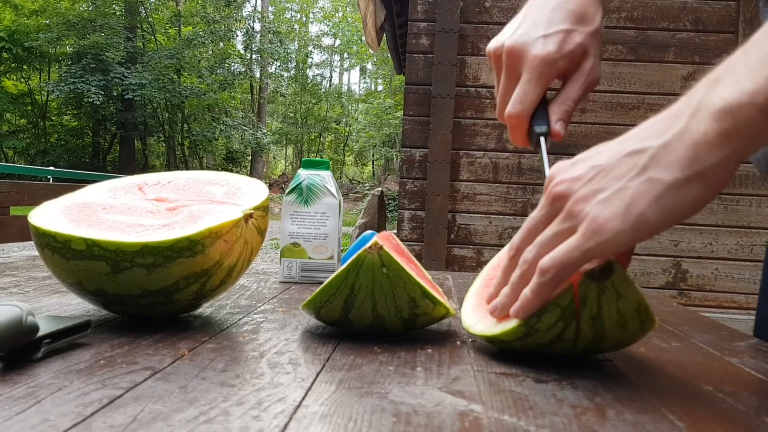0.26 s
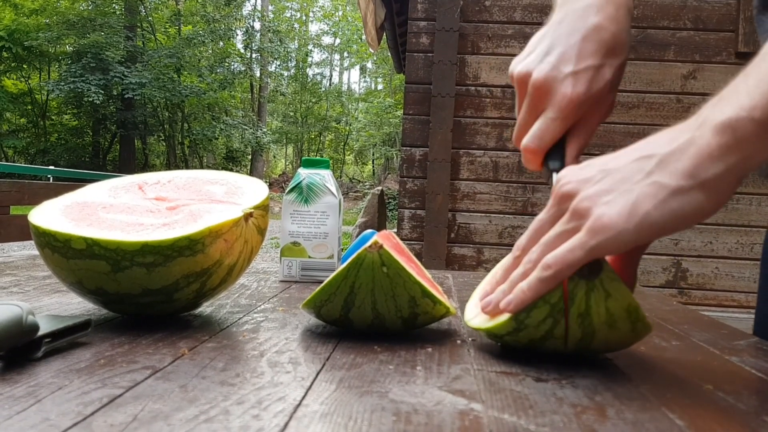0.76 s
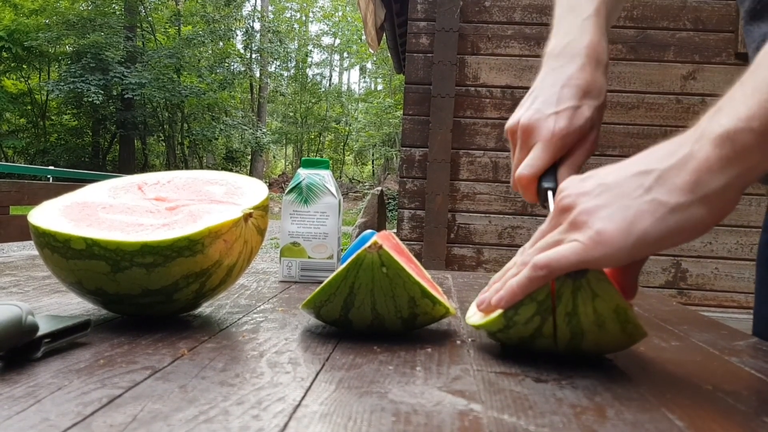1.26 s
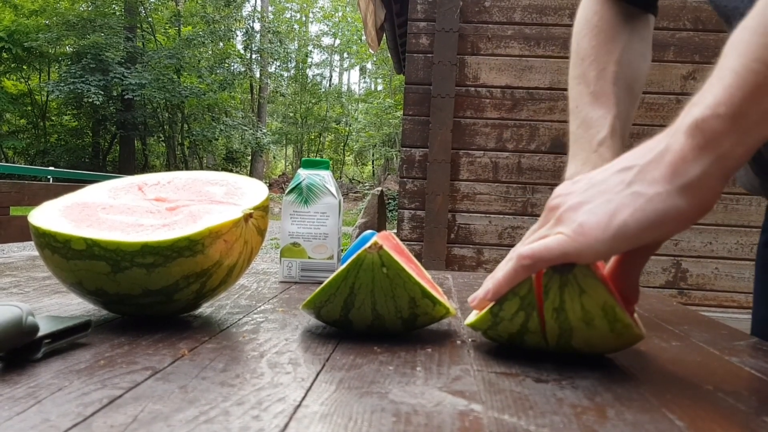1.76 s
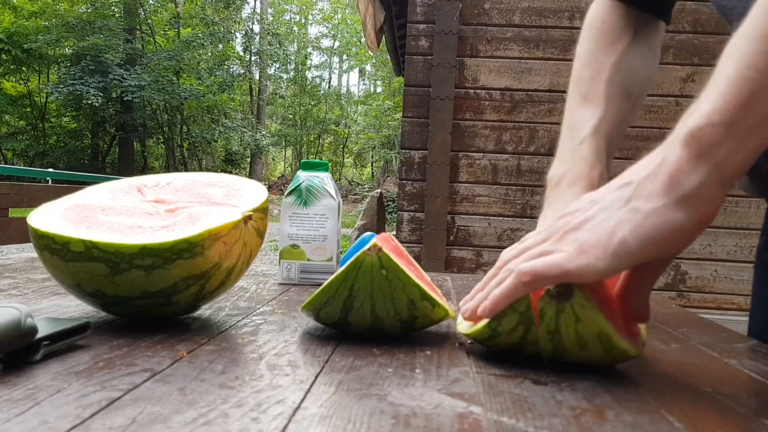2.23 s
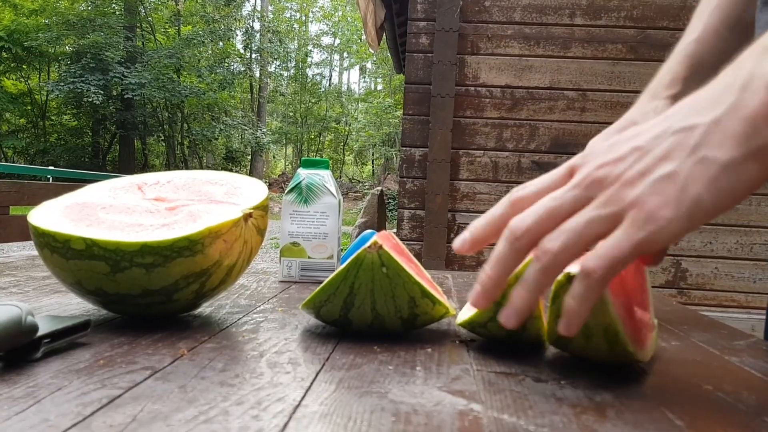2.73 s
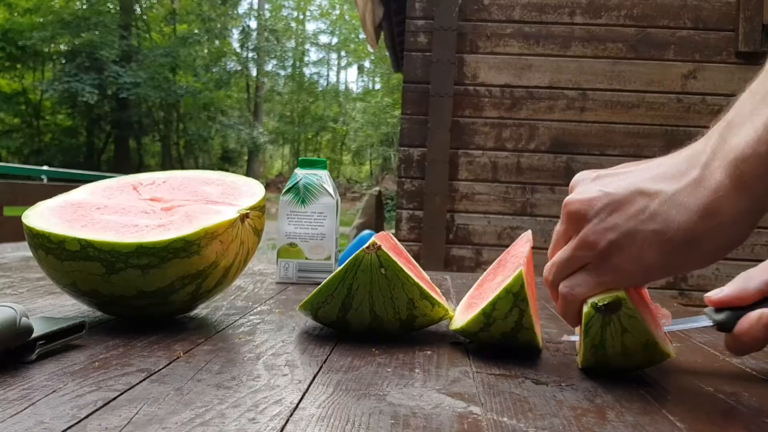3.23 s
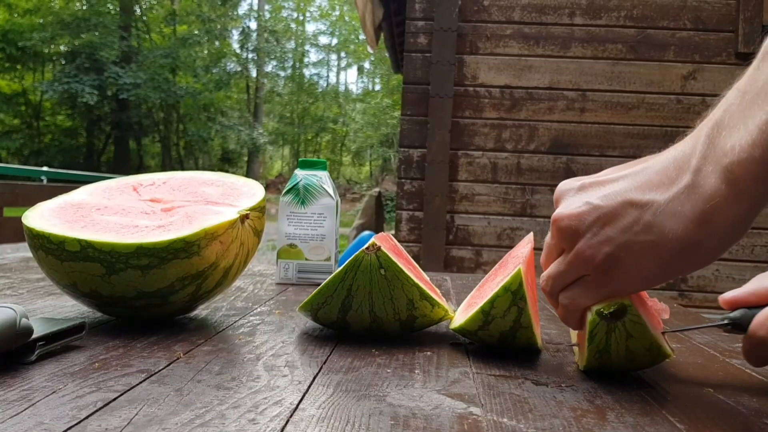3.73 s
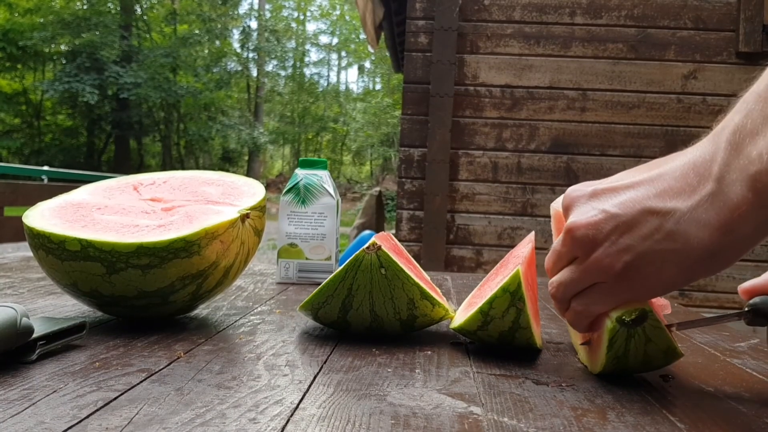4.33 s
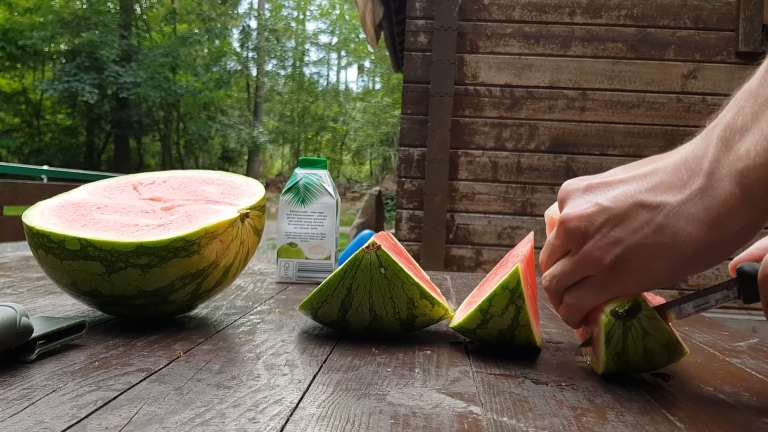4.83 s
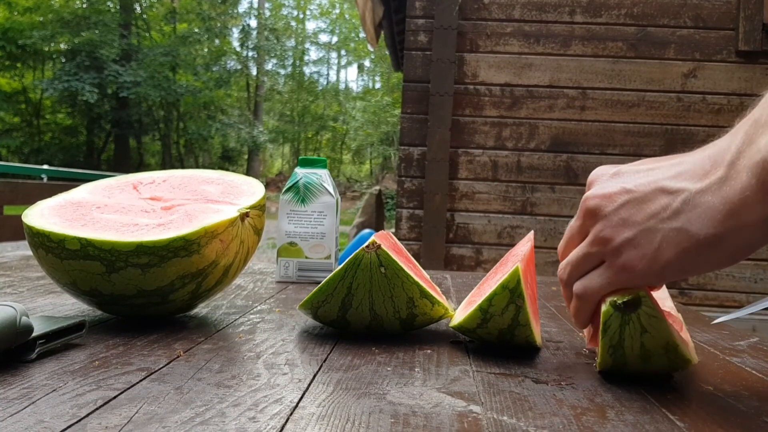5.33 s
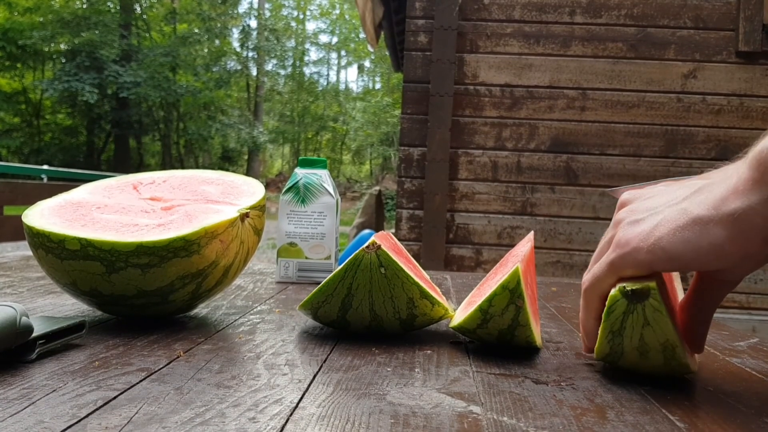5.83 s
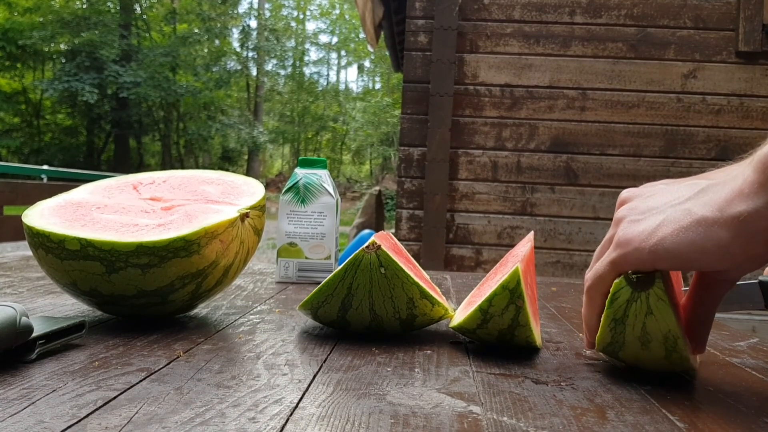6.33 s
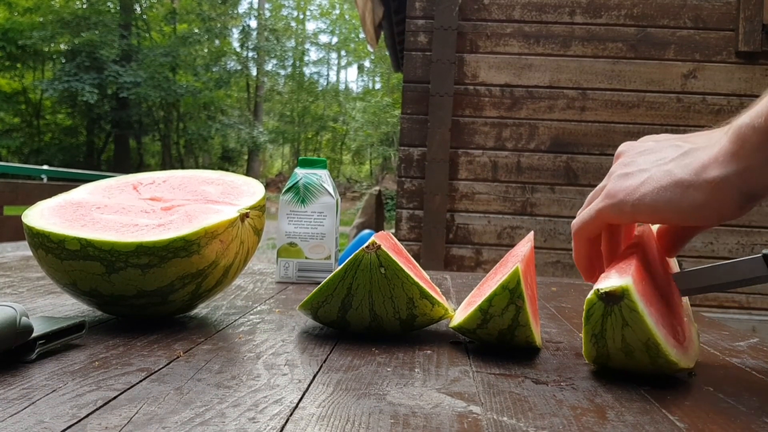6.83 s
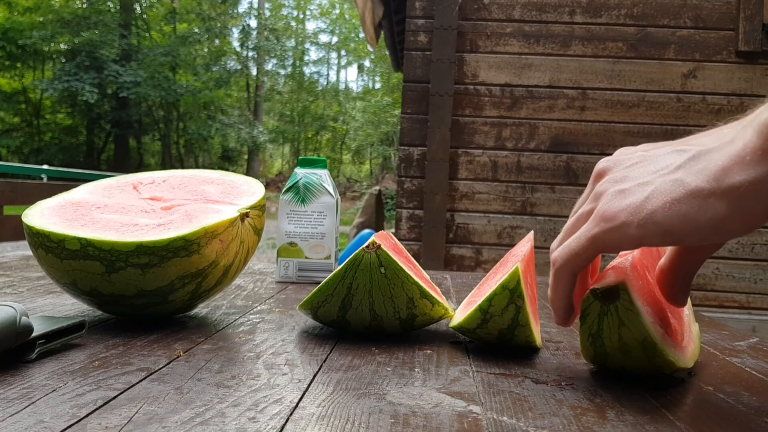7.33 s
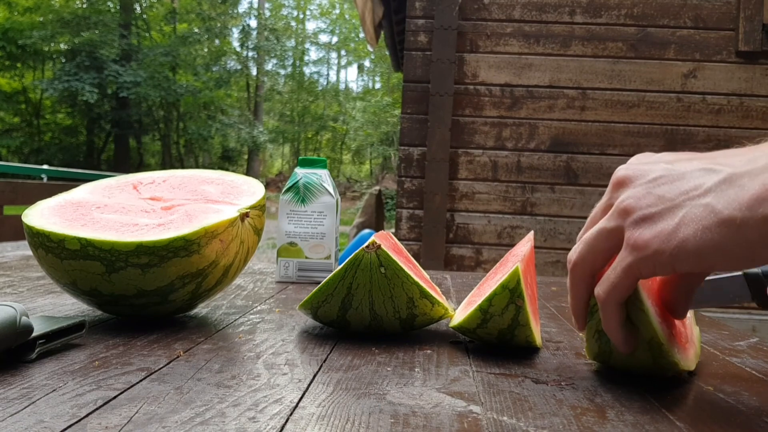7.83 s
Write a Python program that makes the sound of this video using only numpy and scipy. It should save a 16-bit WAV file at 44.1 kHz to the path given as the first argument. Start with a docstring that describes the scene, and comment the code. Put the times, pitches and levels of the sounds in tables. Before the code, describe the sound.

Outdoor birdsong over soft air and low drone; crisp wet melon cutting, one loud woody knock at two seconds, more crackly sawing, faint squeak.

```python
"""Birdsong with long echoes opens the scene, over forest air, a faint far drone and a hum.
A knife then cuts a wedge of watermelon on a wooden table, a little to the right: the rind splits, the blade
breaks through and knocks on the table, then saws through wet flesh and squeaks once.
Birds, hum and squeak are gliding sines; air and drone are shaped noise; cutting is coloured random
clicks and bursts; knocks ring decaying modes of the table and the fruit."""
import sys
import numpy as np
from scipy import signal
from scipy.fft import rfft, irfft
from scipy.io import wavfile
from scipy.ndimage import uniform_filter1d

SR = 44100
rng = np.random.default_rng(int(sys.argv[2]) if len(sys.argv) > 2 else 0)


def output_pcm(signal):
    """Save a mono or channel-first signal as 16-bit PCM at the path in sys.argv[1].

    Samples are clipped to [-1, 1] before scaling.
    """
    pcm = np.clip(np.atleast_2d(signal).T, -1, 1) * 32767
    wavfile.write(sys.argv[1], SR, np.round(pcm).astype(np.int16))


N = 355887
TIME = np.arange(N) / SR  # s
HZ = np.fft.rfftfreq(N, 1 / SR)

# Forest air and microphone hiss. Each row: frequency in Hz, relative density in dB per Hz.
AIR_SPECTRUM = [(24, -31), (40, -2.5), (65, 1), (95, -7), (120, -7), (155, -8), (280, -16), (500, -19),
                (1000, -23), (1500, -29.5), (5000, -40), (7000, -37.5), (8500, -49), (10500, -39),
                (13000, -34.5), (16000, -40.5)]
# Slow level of the background: it swells near 2 s and drops soon after. Each row: time in seconds, level in dB.
AIR_LEVEL = [(0, -55), (2.0, -52.5), (2.4, -56.5), (3.3, -56), (6.5, -54), (8, -55)]
# Likeness of the air at the two microphones. Each row: frequency in Hz, left-right coherence from -1 to 1.
AIR_COHERENCE = [(60, 0.81), (130, 0.78), (290, 0.68), (640, -0.027), (1400, -0.086), (7000, -0.094),
                 (15000, 0.32)]
# Slow level of the far drone. Each row: time in seconds, level in dB before a trim.
DRONE_LEVEL = [(0, -48.5), (3.1, -49), (3.3, -54), (8, -54.5)]
# A hum that drifts in pitch and stops abruptly near 3.2 s. Each row: time in seconds, centre pitch in Hz,
# level in dB.
HUM_PATH = [(0, 210.2, -61.5), (1.2, 212.8, -63.5), (2.399, 204.2, -57.5), (3.18, 201, -61),
            (3.21, 199, -92)]
# Far birds, heard only as echo. Each row: start in seconds, length in seconds, pitch in Hz,
# warble as a share of the pitch, level in dB.
FAR_SONGS = [(0, 1.53, 7480, 0.026, -71.5), (0, 0.78, 2320, 0.087, -68), (1.198, 1.96, 3298, 0.18, -63.5),
             (2.242, 0.93, 7350, 0.042, -78.5), (2.25, 0.044, 3920, 0.048, -64),
             (2.453, .07, 3870, 0.033, -68.5), (2.634, 0.056, 3800, 0.038, -69.5),
             (3.8, 0.16, 7600, 0.02, -64), (4.132, .082, 7730, 0.022, -59.5),
             (4.643, 0.17, 4270, 0.054, -61.5), (5.002, 1, 1913, .12, -76),
             (5.35, 0.0585, 7400, 0.031, -69.5), (6.82, 0.1, 7330, .04, -73),
             (7.667, 0.17, 3170, 0.038, -55.5), (7.945, 0.1, 4380, 0.033, -66)]
# Single glides of various birds. Each row: start in seconds, length in seconds, start pitch in Hz,
# end pitch in Hz, relative level in dB, echo in dB against the note, left-right balance in dB.
GLIDES = [(0.049, .11, 3140, 2142, -50.5, 1.5, -10), (.06, .076, 6150, 4400, -68.5, -11, -11),
          (.589, 0.071, 2767, 2377, -60.5, 3, -7), (1.006, 0.063, 2633, 2640, -66, 12.5, -2),
          (1.047, 0.028, 3040, 3130, -54, 1.5, 0), (1.451, .027, 2990, 3040, -50, -9, 0),
          (1.826, 0.035, 5520, 3940, -56.5, -6, -13), (1.902, .035, 6020, 4240, -53.5, -1.5, -11),
          (2.057, 0.019, 5830, 6250, -56.5, -1, -19.5), (2.124, 0.031, 5700, 6350, -57, -4, -17),
          (2.142, 0.0184, 4230, 5350, -55.5, -4, -10), (3.014, 0.14, 2253, 1684, -61, 2.5, -16),
          (3.329, 0.071, 2080, 2177, -46, -4, -12), (7.125, 0.12, 1643, 1892, -76.5, 19, -7),
          (7.21, 0.055, 1853, 2066, -60.5, 12, -8), (7.427, 0.049, 1985, 2136, -53.5, 9, -22),
          (7.926, 0.15, 2595, 2377, -59.5, 9, 7)]
# A small bird's repeated chip. Each row: start in seconds, relative level in dB.
CHIPS = [(2.316, -48.5), (2.527, -49.5), (2.717, -49.5), (2.92, -55.5), (3.106, -59.5)]
# The chip falls and levels out: pitch in Hz at start, middle and end.
CHIP_HZ = (6310, 5530, 5400)
CHIP_S, CHIP_ECHO_DB, CHIP_PAN_DB = 0.0492, -7, -12  # negative pan is to the right
# A thrush-like bird's downward slurs. Each row: start in seconds, length in seconds, start pitch in Hz,
# relative level in dB, echo in dB against the note, left-right balance in dB.
SLURS = [(3.828, 0.058, 4000, -57, 6.5, 5), (4.435, 0.052, 4065, -46, -0.5, 0),
         (4.529, 0.066, 3783, -49, 1, -7), (5.207, .07, 4250, -51.5, 1, -3),
         (5.308, 0.061, 3770, -49.5, 0.5, 1), (6.09, .065, 4260, -51, 4, -6),
         (6.689, 0.07, 4260, -53.5, 0.5, -11.5), (6.789, 0.052, 3614, -50.5, 0, -7)]
# Where every slur lands: pitch in Hz at middle and end.
SLUR_LANDING_HZ = (3163, 2520)
# The arched whistle that ends each of its phrases. Each row: start in seconds, relative level in dB.
WHISTLES = [(4.08, -45.5), (4.796, -45), (5.615, -45), (7.065, -46.5)]
# Arch of the whistle: pitch in Hz at start, middle and end.
WHISTLE_HZ = (2885, 2932, 2634)
WHISTLE_S, WHISTLE_ECHO_DB, WHISTLE_PAN_DB = 0.135, -2, -4.5

# Strokes of the blade, and the fruit falling apart and shuddering after the knock.
# Each row: start in seconds, length in seconds, swell from start to end in dB, then
# relative levels in dB of the fizz of bursting cells, the deeper crunch and the shudder of the table.
STROKES = [(0.466, 0.13, 1, -71, -69.5, -86), (0.56, 0.036, 4.5, -63, -58, -60),
           (0.857, 0.044, 15, -63.5, -64.5, -76), (1.439, 0.11, 10, -67, -63.5, -49),
           (1.643, 0.063, 1.5, -47.5, -48.5, -45.5), (1.978, 0.025, 15, -45.5, -59, -39),
           (2.006, 0.008, -13, -45.5, -41.5, -36.5), (2.026, .12, -18, -67.5, -73, -41.5),
           (2.21, 0.032, 0, -77, -74, -50), (3.245, 0.055, -1.5, -55.5, -57.5, -63),
           (3.401, 0.072, 4.5, -53, -53, -68), (3.542, 0.12, 3, -57.5, -58.5, -72),
           (3.694, 0.11, -11.5, -52, -53.5, -76), (3.926, 0.046, 0, -57, -58.5, -64),
           (4.033, 0.1, -2.5, -58.5, -61, -71), (4.28, 0.024, -0.5, -52, -59.5, -69),
           (4.42, 0.081, -13.5, -57.5, -59, -63), (4.654, 0.13, -10, -59.5, -75, -72),
           (4.827, 0.055, 4, -60, -65, -56.5), (4.955, 0.038, -11, -48, -60, -48.5),
           (6.149, 0.085, 9, -60, -60, -58), (6.276, .04, 5.5, -59.5, -64, -53.5),
           (7.748, 0.14, -3, -63.5, -60.5, -63), (7.893, 0.034, 2.5, -60.5, -57, -49.5)]
# Between strokes the blade drags in the cut. Each row: start in seconds, end in seconds.
DRAGS = [(1.42, 1.78), (3.22, 5.0)]
# Relative levels of the drag in dB: fizz, crunch, shudder.
DRAG_LEVELS = (-70, -72.5, -71)
ATTACK_S, RELEASE_S = 0.03, 0.048  # a stroke rises and dies by 20 dB in these times
# Colour of cracks and fizz. Each row: frequency in Hz, relative level in dB.
CRACK_COLOUR = [(200, -21.5), (1000, -8.5), (2200, -2), (3300, 10), (4400, 3.5), (6000, 3.5), (8300, -2),
                (10500, 5), (13000, 4.5), (16000, -3.5)]
# Colour of the crunch in the flesh. Each row: frequency in Hz, relative level in dB.
FLESH_COLOUR = [(60, -8), (170, -2), (300, -6.5), (550, -7), (800, -2.5), (1180, 1.5), (1480, -2),
                (1900, 1.5), (2200, 5.5), (2700, 7.5), (4000, 0), (9000, -44.5)]
# Colour of the table's shudder under the fruit. Each row: frequency in Hz, relative level in dB.
SHUDDER_COLOUR = [(30, -16), (60, -11), (112, -5), (155, 5.5), (230, -7), (290, -1), (420, -15.5),
                  (560, -11.5), (900, -31), (3000, -57)]
# Softer fruit sounds duller. Each row: time in seconds, boost in dB of the fizz below about 7 kHz.
SOFTNESS = [(.5, 1.5), (1.5, 5.5), (1.7, 4), (2.0, 6), (3.28, 15), (3.7, 7), (4.3, 7), (4.7, 1.5), (5, 2.5),
            (6.25, 2), (7.85, 5)]
# A hollow opens in the cut and rings. Each row: time in seconds, resonance added to the crunch in dB.
HOLLOW = [(.9, -7), (1.68, 6), (2, -18), (3.3, -34), (3.7, -14), (4.5, -21), (6.3, -11), (7.7, -13),
          (7.82, 10), (7.95, -8)]
# Larger fibres that snap. Each row: time in seconds, peak of the crack in dB, peak of the pop in the
# flesh in dB, both before a trim.
SNAPS = [(.904, -42, -36.5), (1.49, -36, -34), (1.525, -35, -33.5), (1.539, -29.5, -36),
         (1.5623, -33.5, -44), (1.622, -26, -32.5), (1.664, -28, -45), (1.997, -13.5, -16),
         (1.9993, -12, -35), (3.21, -33.5, -36), (3.263, -37, -27.5), (3.306, -32.5, -34),
         (3.364, -31.5, -34), (3.408, -22, -50), (3.428, -32, -25.5), (3.479, -29, -25.5),
         (3.587, -30.5, -25.5), (3.6467, -26.5, -26), (3.688, -36, -23), (3.709, -29, -39),
         (3.951, -39, -30.5), (4.04, -31.5, -32), (4.103, -28, -24.5), (4.3, -37, -34), (4.344, -35, -31),
         (4.421, -38, -29.5), (4.644, -27.5, -50), (4.675, -20, -36.5), (4.708, -30, -50),
         (4.8086, -21.5, -27.5), (4.8509, -16, -24.5), (4.8528, -17, -35), (4.908, -19.5, -33),
         (4.9129, -20.5, -52), (4.9485, -17, -23), (4.962, -16, -43), (7.8239, -50, -28.5)]
# Blows on the table. Each row: time in seconds, drive of the table's ring in dB, contact in seconds,
# then dB of the steel's tick, the boards' thud and the fruit's thump.
KNOCKS = [(2.0195, -1.5, 0.00012, -11, -4, -21.5), (2.0214, -11.5, 0.0017, -22, -15, -31),
          (2.0313, -31.5, 0.00074, -31.5, -26, -24), (2.274, -25.5, 0.001, -66, -47, -33.5)]
# Modes of the table top. Each row: frequency in Hz, relative level in dB, 60 dB decay in seconds.
TABLE_MODES = [(66, -37, .45), (80, -34, .45), (140, -46, .22), (168, -36, .13), (198, -32, .15),
               (279, -24, .2), (300, -22, .09), (347, -31, .13), (527, -21, .12), (580, -21, .06),
               (678, -28, .09), (799, -20, .075), (950, -21, .04), (1130, -25, .03), (1244, -16, .06),
               (1395, -29, .06), (1590, -19, .04), (1708, -18, .05), (1830, -22, .025), (2560, -34, .04),
               (3600, -31, .025)]
# Dense, short-lived ring of the boards. Each row: frequency in Hz, relative level in dB.
BOARD_COLOUR = [(40, -21.5), (170, -12.5), (290, 10), (420, -10.5), (560, 12.5), (900, -0.5), (1200, 4),
                (1450, -3.5), (1750, 1), (2200, -21), (4000, -2), (9000, -36.5)]
# Modes of the fruit's body. Each row: frequency in Hz, relative level in dB, 60 dB decay in seconds.
FRUIT_MODES = [(299, -1.5, 0.11), (550, -3.5, 0.041)]
# The wet blade's squeak. Each row: time in seconds, pitch in Hz, rms level in dB.
SQUEAK_PATH = [(6.49, 10400, -80), (6.56, 12950, -69), (6.62, 13680, -68), (6.70, 13280, -68),
               (6.78, 12300, -70), (6.87, 10700, -82)]
# Balance of the near sounds. Each row: frequency in Hz, left over right in dB.
NEAR_BALANCE = [(100, 3.5), (400, -3), (750, -4), (1300, -7), (2400, -4.5), (4400, -8), (8000, -5.5),
                (14000, 4)]
# Lag of the left microphone on near sounds. Each row: frequency in Hz, phase in radians.
LEFT_LAG = [(0, 0.5), (1500, 0.95), (4050, 3.5), (6200, 4.5), (8500, 7.5), (16000, 7.5)]


def gain_of(db):
    """Decibels to amplitude."""
    return 10 ** (np.asarray(db) / 20)


def evened(x):
    """Scales to rms 1."""
    return x / np.sqrt(np.mean(x ** 2) + 1e-20)


def peaked(x):
    """Scales to peak 1."""
    return x / abs(x).max()


def read(points, hz):
    """Reads a spectrum on a log-frequency axis."""
    f, value = np.transpose(points)
    return np.interp(np.log(hz + 1), np.log(f + 1), value)


def over_time(points):
    """Reads a (seconds, value) curve along the whole scene."""
    return np.interp(TIME, *np.transpose(points))


def add(mix, s, sound):
    """Mixes a sound in at time s."""
    start = max(round(s * SR), 0)
    part = mix[..., start:][..., :sound.shape[-1]]
    part += sound[..., :part.shape[-1]]


def colour(x, points, size=2048):
    """Minimum-phase filter with the given spectral shape and unit energy."""
    log_gain = np.log(gain_of(read(points, abs(np.fft.fftfreq(size, 1 / SR)))))
    min_phase = np.exp(np.conj(signal.hilbert(log_gain)))
    ring = np.fft.ifft(min_phase).real[:size // 2]
    return signal.oaconvolve(x, ring / np.linalg.norm(ring))[:len(x)]


def band(x, lo_hz, hi_hz):
    """Keeps one band of a whole track."""
    return irfft(rfft(x) * ((HZ > lo_hz) & (HZ < hi_hz)), N)


def wander(rate, size, count=4096):
    """Random curve of rms near 1: straight lines between fresh values, rate times a second."""
    return np.interp(np.arange(size) * rate / SR, np.arange(count), rng.standard_normal(count))


def echo(x, t60, delay):
    """Diffuse reflections as a decaying noise tail of about unit energy, different at each microphone."""
    t = np.arange(2 * SR) / SR
    build_up = 1 - np.exp(-(t / delay) ** 2)
    tail = rng.standard_normal((2, len(t))) * gain_of(-60 * t / t60) * build_up
    return signal.fftconvolve(x[None], tail / np.linalg.norm(tail[0]), axes=1)[:, :N]


def air():
    """Soft outdoor rumble and hiss: coloured noise, partly shared by the microphones, fluctuating in level."""
    left, other = rfft(rng.standard_normal((2, N)))
    same = np.clip(read(AIR_COHERENCE, HZ), -1, 1)
    right = same * left + np.sqrt(1 - same ** 2) * other
    wash = evened(irfft(np.array([left, right]) * gain_of(read(AIR_SPECTRUM, HZ)), N))
    return wash * gain_of(over_time(AIR_LEVEL) + 2.7 * wander(26, size=N))


def drone(centre_hz=80, width_hz=5, trim_db=-1):
    """Far drone: narrow-band noise wavers as its close frequencies beat."""
    narrow = rfft(rng.standard_normal(N)) / (1 + ((HZ - centre_hz) / width_hz) ** 2)
    beating = evened(irfft(narrow, N))
    shallow = evened(beating / (abs(signal.hilbert(beating)) + 0.47))  # keeps its beats shallow
    return shallow * gain_of(trim_db + over_time(DRONE_LEVEL))


def hum(overtone_db=-13, waver_hz=2.7):
    """A sine and its octave drift in pitch, then stop abruptly."""
    s, hz, db = np.transpose(HUM_PATH)
    pitch = np.interp(TIME, s, hz) + waver_hz * wander(4.6, size=N)
    angle = 2 * np.pi * np.cumsum(pitch) / SR
    return (np.sin(angle) + gain_of(overtone_db) * np.sin(2 * angle)) * gain_of(np.interp(TIME, s, db))


def far_birds():
    """Sines with randomly warbling pitch arrive from deep in the forest as echo alone."""
    far = np.zeros(N)
    for s, length, hz, warble, db in FAR_SONGS:
        size = int(length * SR)
        turns = np.cumsum(hz * (1 + warble * wander(140, size=size))) / SR
        song = np.sqrt(2) * np.sin(2 * np.pi * turns)
        add(far, s, gain_of(db) * song * signal.windows.tukey(size, .2))
    return echo(far, t60=0.51, delay=0.008)


def note(length, contour_hz, waver=0.009, sweep_rough=0.065, swell_db=0., flutter_db=0.6, overtone_db=-28):
    """One whistled note along a smooth pitch contour; wide sweeps are rougher than level whistles."""
    u = np.arange(0, 1, 1 / (length * SR))  # progress through the note
    knots = np.linspace(0, 1, len(contour_hz))
    hz = np.exp(np.polyval(np.polyfit(knots, np.log(contour_hz), len(contour_hz) - 1), u))
    rough_hz = waver * hz.mean() + sweep_rough * abs(hz[0] - hz[-1])
    hz += rough_hz * wander(320, size=len(u))
    flutter = gain_of(swell_db * (u - .5) + flutter_db * wander(150, size=len(u)))
    loudness = np.sqrt(2 * np.sin(np.pi * u)) * flutter
    angle = 2 * np.pi * np.cumsum(hz) / SR
    return loudness * (np.sin(angle) + gain_of(overtone_db) * np.sin(2 * angle))


def glides():
    """Various birds: each note slides from one pitch to another."""
    for s, length, start_hz, end_hz, *mix in GLIDES:
        yield s, note(length, (start_hz, end_hz), waver=.016, overtone_db=-38), *mix


def chips():
    """A small bird on the right: a short falling whistle that levels out."""
    for s, db in CHIPS:
        sound = note(CHIP_S, CHIP_HZ, waver=0.0035, sweep_rough=0.014, swell_db=3.5, overtone_db=-39)
        yield s, sound, db, CHIP_ECHO_DB, CHIP_PAN_DB


def slurs():
    """A thrush-like bird: rough notes slur down from various pitches to one landing."""
    for s, length, hz, *mix in SLURS:
        sound = note(length, (hz, *SLUR_LANDING_HZ), sweep_rough=.09, swell_db=4.5, overtone_db=-30)
        yield s, sound, *mix


def whistles():
    """The thrush-like bird's phrase ending: a longer whistle whose pitch arches."""
    for s, db in WHISTLES:
        sound = note(WHISTLE_S, WHISTLE_HZ, waver=0.012, overtone_db=-34)
        yield s, sound, db, WHISTLE_ECHO_DB, WHISTLE_PAN_DB


def birds(forest_t60=1.25, direct_db=-3, branches_db=-3):
    """Near branches blur the notes and the trees scatter them into a long echo."""
    direct, sent = np.zeros((2, N)), np.zeros(N)
    for s, sound, db, echo_db, pan_db in [*glides(), *chips(), *slurs(), *whistles()]:
        add(direct, s, sound * gain_of([[db + pan_db / 2], [db - pan_db / 2]]))
        add(sent, s, sound * gain_of(db + echo_db))
    branches = echo(sent, t60=.16, delay=.002)
    forest = echo(sent, forest_t60, delay=0.017)
    return gain_of(direct_db) * direct + gain_of(branches_db) * branches + forest


def gate_db(start, end):
    """Straight attack and release slopes in dB around a held stretch."""
    return -20 * (np.maximum(start - TIME, 0) / ATTACK_S + np.maximum(TIME - end, 0) / RELEASE_S)


def stroke_levels(judder_db=2.0, judders_per_s=75):
    """Each row of STROKES attacks, swells or fades, and releases; a fast judder runs over all of them."""
    power = np.zeros((3, N))  # fizz, crunch, shudder
    for start, length, swell_db, *levels_db in STROKES:
        progress = np.clip((TIME - start) / length, 0, 1)
        shape_db = gate_db(start, start + length) + swell_db * (progress - .5)
        heard = shape_db > -60
        power[:, heard] += np.outer(gain_of(levels_db), gain_of(shape_db[heard])) ** 2
    for start, end in DRAGS:
        shape_db = np.maximum(gate_db(start, end), -60)
        power += np.outer(gain_of(DRAG_LEVELS), gain_of(shape_db)) ** 2
    return np.sqrt(power) * gain_of(judder_db * wander(judders_per_s, size=N))


def catching(hold=0.013):
    """The blade catches on a larger fibre before it snaps, and the cutting dips for hold seconds."""
    slide = np.ones(N)
    for s, _, _ in SNAPS:
        slide[int((s - hold) * SR):int(s * SR)] = .65
    return uniform_filter1d(slide, size=200)


def burst(decay, rise=0.0002, size=2048):
    """A tiny rupture: a dense rattle that swells in an instant and dies quickly."""
    t = np.arange(size) / SR
    return rng.choice([-1, 1], size) * np.exp(-t / decay) * (1 - np.exp(-t / rise))


def cells(per_s, spread_db, clump_db, wash):
    """Cells burst at random, in clumps, with sizes from tiny to large, over a smooth wet rub."""
    size = gain_of(spread_db * np.minimum(rng.exponential(1, N), 3))
    clicks = size * rng.choice([-1, 1], N) * (rng.random(N) < per_s / SR)
    wet_rub = wash * rng.standard_normal(N)
    return (evened(clicks) + wet_rub) * gain_of(clump_db * wander(260, size=N))


def fibres(per_s, size_db, spread_db=3, decay=0.0013):
    """Small fibres snap at random: one burst repeated at scattered times and sizes."""
    happens = rng.random(N) < per_s / SR
    sizes = gain_of(spread_db * np.clip(rng.standard_normal(N), -2, 2)) * happens
    return gain_of(size_db) * evened(signal.oaconvolve(sizes, burst(decay))[:N])


def cutting(levels, fizz_db=1.0, crunch_db=-1.5, shudder_db=-1,
            dull_hz=7200, hollow_hz=1170, hollow_width_hz=260):
    """Bursting cells and fibres make a fine fizz at the edge and a crunch in the flesh; the table shudders."""
    fizz_level, crunch_level, shudder_level = levels
    grains = cells(per_s=1800, spread_db=2, clump_db=3.5, wash=0.17)
    small_snaps = fibres(per_s=60, size_db=-4)
    large_cells = cells(per_s=450, spread_db=4.5, clump_db=3.5, wash=0.57)
    fizz = colour(grains + small_snaps, CRACK_COLOUR)
    crunch = colour(0.38 * grains + 0.78 * small_snaps + large_cells, FLESH_COLOUR)
    shudder = evened(colour(rng.standard_normal(N), SHUDDER_COLOUR))
    # level each layer by its characteristic band
    fizz /= band(fizz, 8200, 16000).std()
    crunch /= band(crunch, 800, 1700).std()
    dull = irfft(rfft(fizz) / (1 + (HZ / dull_hz) ** 10), N)
    fizz += dull * (gain_of(over_time(SOFTNESS)) - 1)
    hollow = signal.lfilter(*signal.iirpeak(hollow_hz, hollow_hz / hollow_width_hz, SR), crunch)
    crunch += hollow * gain_of(over_time(HOLLOW))
    cut = gain_of(fizz_db) * fizz * fizz_level
    cut += gain_of(crunch_db) * crunch * crunch_level
    return cut + gain_of(shudder_db) * shudder * shudder_level


def snaps(crack_decay=0.0013, pop_decay=0.0017, crack_trim_db=-2.5, pop_trim_db=-1.0):
    """Larger fibres give way: a bright crack and a pop in the flesh."""
    out = np.zeros(N)
    for s, crack_db, pop_db in SNAPS:
        crack = peaked(colour(burst(crack_decay, rise=0.00052), CRACK_COLOUR))
        pop = peaked(colour(burst(pop_decay), FLESH_COLOUR))
        add(out, s, gain_of(crack_db + crack_trim_db) * crack)
        add(out, s, gain_of(pop_db + pop_trim_db) * pop)
    return out


def ringing(modes, t):
    """A struck body: decaying sines, one for each mode."""
    return sum(gain_of(db - 60 * t / t60) * np.sin(2 * np.pi * hz * t) for hz, db, t60 in modes)


def knocks(tick_decay=0.0021, rattle_decay=0.0042, rattle_db=-8, ring_db=-3):
    """The blade, then the fruit, push on the table; a short contact reaches its higher modes."""
    out, t = np.zeros(N), np.arange(SR) / SR
    ring = gain_of(ring_db) * ringing(TABLE_MODES, t)
    thud = peaked(colour(signal.unit_impulse(2048), BOARD_COLOUR))
    thump = ringing(FRUIT_MODES, t)
    for s, db, contact, tick_db, thud_db, fruit_db in KNOCKS:
        push = np.sin(np.pi * np.minimum(t[:512] / contact, 1))  # half a sine of force
        rattle = gain_of(rattle_db) * peaked(colour(burst(rattle_decay), BOARD_COLOUR))  # boards chatter
        tick = peaked(colour(burst(tick_decay), CRACK_COLOUR))
        add(out, s, gain_of(db) * signal.fftconvolve(ring, push / push.sum()))
        add(out, s, gain_of(tick_db) * tick)
        add(out, s, gain_of(thud_db) * (thud + rattle))
        add(out, s, gain_of(fruit_db) * thump)
    return out


def squeak(waver=0.00239):
    """A thin whistle that rises and falls as the wet blade slides."""
    s, hz, db = np.transpose(SQUEAK_PATH)
    path = uniform_filter1d(np.interp(TIME, s, hz), size=1500)
    pitch = path * (1 + waver * wander(150, size=N))
    whistle = np.sqrt(2) * np.sin(2 * np.pi * np.cumsum(pitch) / SR)
    return whistle * gain_of(np.interp(TIME, s, db, -200, -200))


def scene(far_side_db=-7, scatter_db=-15, wall_db=-21):
    """The fruit lies to the right; the table top and the cabin wall reflect its sounds."""
    levels = stroke_levels() * catching()
    near = cutting(levels) + snaps() + knocks() + squeak()
    far_side = gain_of(far_side_db) * cutting(levels)  # grains from round the other side of the wedge
    side_db = read(NEAR_BALANCE, HZ) / 2
    left = gain_of(side_db) * np.exp(-1j * np.interp(HZ, *np.transpose(LEFT_LAG)))
    microphones = np.array([left, gain_of(-side_db)])
    # the conjugate turns the left microphone's lag into a lead
    direct = irfft(rfft(near) * microphones + rfft(far_side) * microphones.conj(), N)
    table_top = gain_of(scatter_db) * echo(near, t60=0.074, delay=0.0026)
    wall = gain_of(wall_db) * echo(near, t60=0.15, delay=0.0053)
    return air() + drone() + hum() + far_birds() + birds() + direct + table_top + wall


def record(dry, low_cut_hz=32, ceiling=.95, edge_hz=15950):
    """The microphone sheds the deepest rumble and rounds off peaks; then the recorder's band limit."""
    low_cut = signal.butter(4, low_cut_hz, "highpass", fs=SR, output="sos")
    thinned = signal.sosfilt(low_cut, dry)
    rounded = ceiling * np.tanh(thinned / ceiling)
    band_limit = signal.firwin(511, edge_hz, window=("kaiser", 9), fs=SR)
    return signal.oaconvolve(rounded, band_limit[None], "same")


dry = scene()
out = record(dry)
output_pcm(out)
```